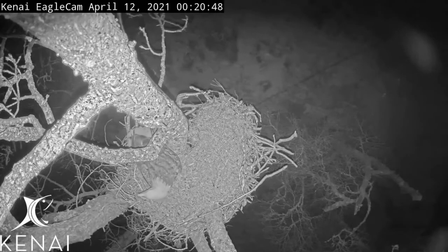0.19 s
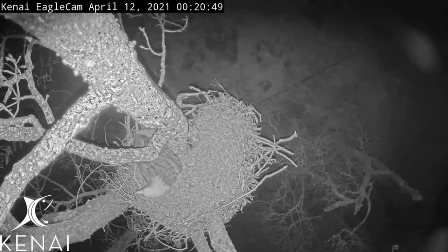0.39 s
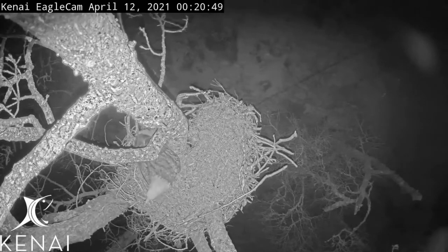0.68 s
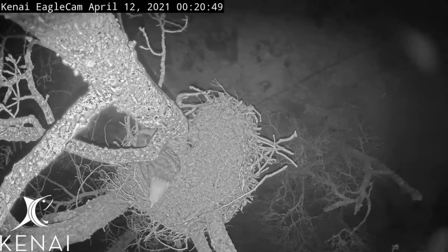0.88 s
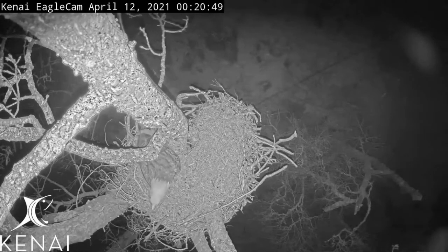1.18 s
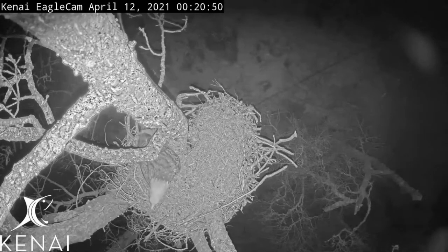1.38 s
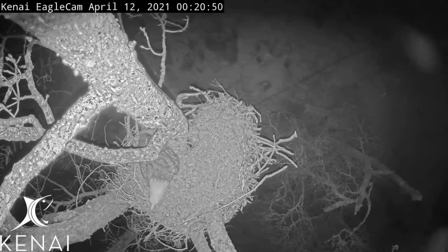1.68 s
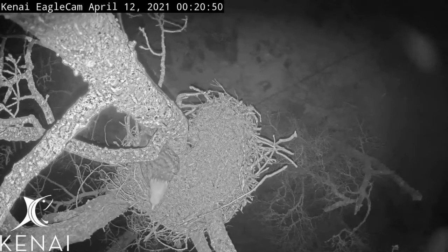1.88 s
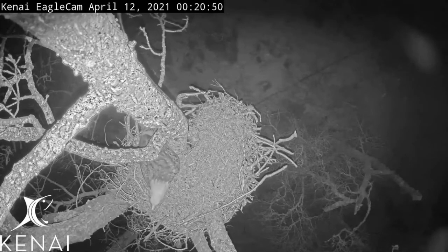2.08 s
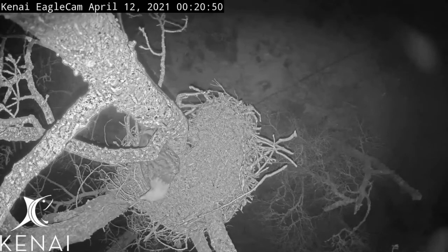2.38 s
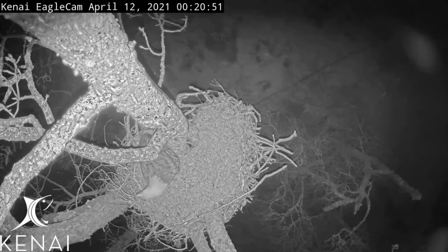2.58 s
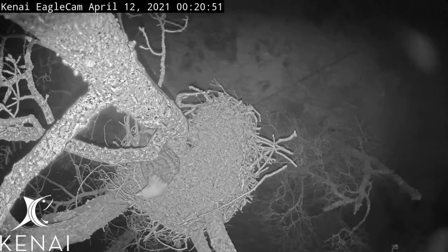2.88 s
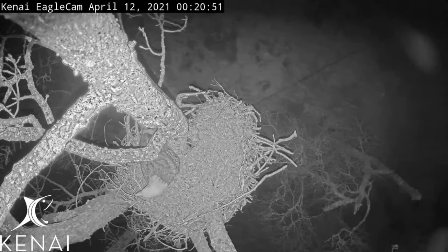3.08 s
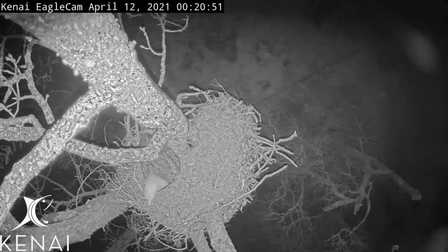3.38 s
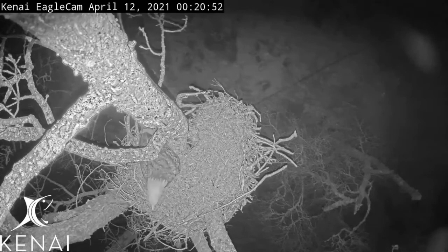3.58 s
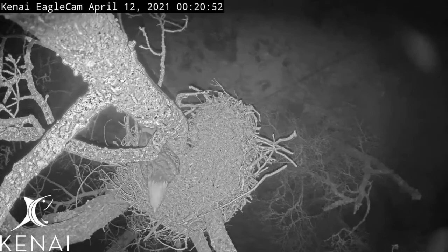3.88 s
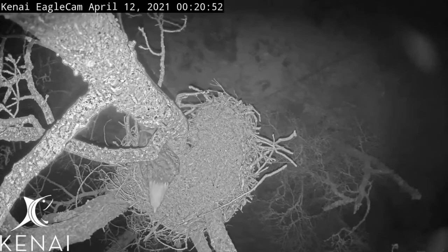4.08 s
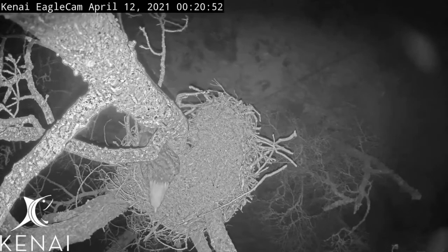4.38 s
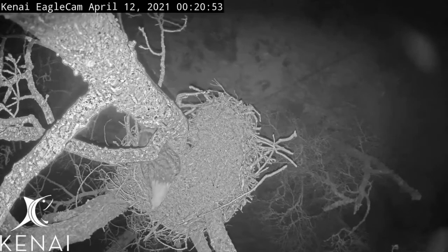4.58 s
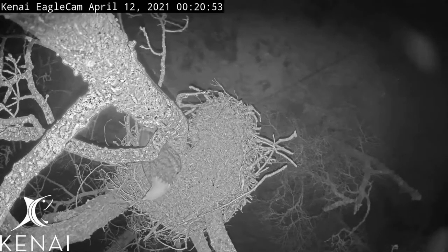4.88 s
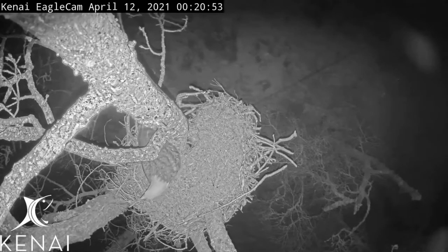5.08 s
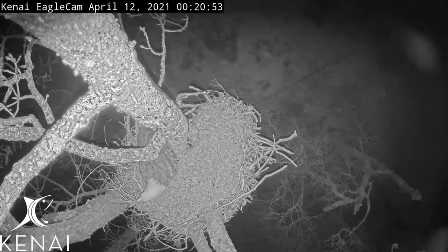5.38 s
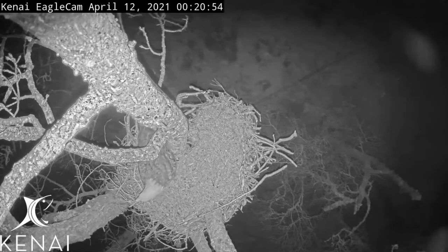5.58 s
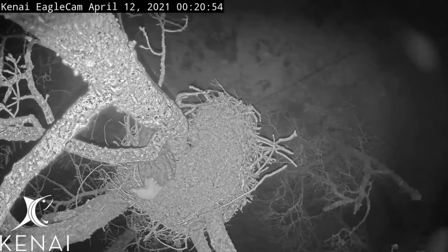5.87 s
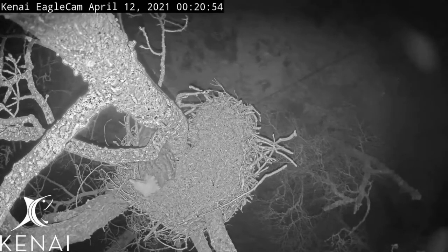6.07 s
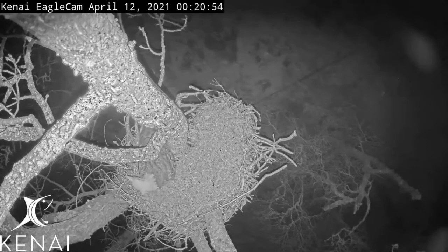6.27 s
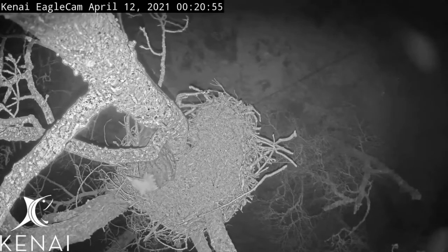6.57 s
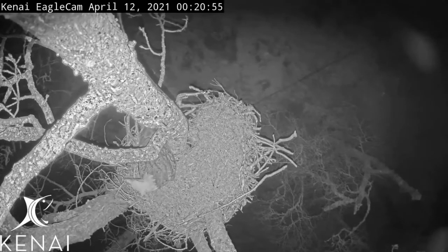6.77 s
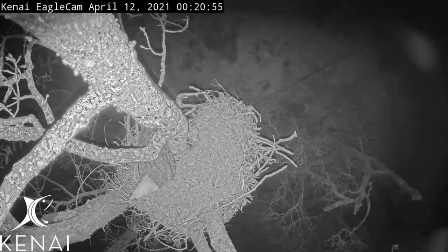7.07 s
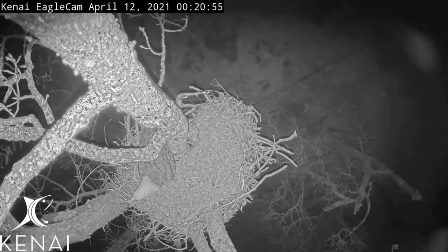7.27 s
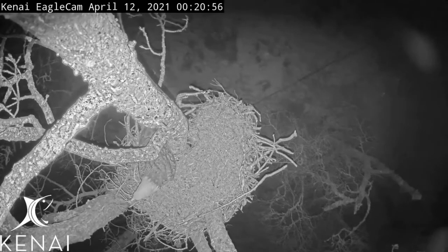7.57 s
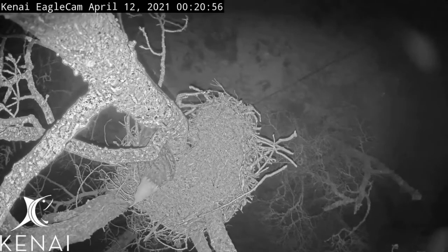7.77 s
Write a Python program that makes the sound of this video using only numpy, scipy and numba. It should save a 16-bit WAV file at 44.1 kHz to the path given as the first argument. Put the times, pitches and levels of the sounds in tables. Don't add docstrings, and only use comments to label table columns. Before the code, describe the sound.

An eagle at a nest gives two bouts of quick, high piping whistles at night while gusty wind rumbles and thumps on the microphone.

```python
import sys
import numpy as np
from scipy import signal
from scipy.fft import rfft, irfft
from scipy.io import wavfile
from scipy.ndimage import uniform_filter1d
from numba import njit

SR = 44100
rng = np.random.default_rng(int(sys.argv[2]) if len(sys.argv) > 2 else 0)


def materialize(psi):
    bounded = np.clip(np.atleast_2d(psi).T, -1, 1)
    quanta = np.round(bounded * 32767).astype(np.int16)
    wavfile.write(sys.argv[1], SR, quanta)


def gain_from_decibels(decibels):
    exponent = np.asarray(decibels, float) / 20
    return 10 ** exponent


N = 347508

LEAD_S = 0.008
REST_HZ = 3000
NOTE_MAX = SR // 4

# (frequency [Hz], gain [dB])
THROAT = [(3000, 1.5), (3700, 0), (4400, 2.5), (5100, -6.5), (5800, -7), (6300, -11)]
# (level [dB], octave level [dB])
CHIRP_SHAPE = [(5, -6.5), (1, -8.5), (0.5, 1), (-2.5, -7), (-4.5, 10.5)]


def unit(x):
    return x / np.sqrt(np.mean(x ** 2))


def walk(rate, size=N):
    k = max(int(SR / rate), 1)
    steps = np.repeat(rng.standard_normal(max(size, NOTE_MAX) // k + 1), k)
    return 1.56 * uniform_filter1d(uniform_filter1d(steps, k), k)[:size]


def coloured(points, size=N):
    hz, db = np.transpose(points)
    bins = np.arange(size // 2 + 1) * SR / size + 1
    shape = gain_from_decibels(np.interp(np.log(bins), np.log(hz), db, left=-90, right=-90))
    return unit(irfft(rfft(rng.standard_normal(size)) * shape, size))


@njit
def svf(x, hz, width):
    y, b, l = np.empty(len(x)), 0., 0.
    for i in range(len(x)):
        g, k = np.tan(np.pi * hz[i] / SR), width / hz[i]
        v = (b + g * (x[i] - l)) / (1 + g * (g + k))
        b, l, y[i] = 2 * v - b, l + 2 * g * v, k * v
    return y


def resonant_noise(size, drawn, hz, width):
    noise = rng.standard_normal(drawn)[:size]
    return unit(svf(svf(noise, hz, width), hz, width))


def gate(size, attack_s, release_s):
    t = np.arange(size) / SR
    return np.clip(np.minimum(t / attack_s, t[::-1] / release_s), 0, 1) ** 2


def add(track, sound, start_s):
    i = int(start_s * SR)
    track[i:i + len(sound)] += sound[:len(track) - i]


def gusts():
    # (time [s], level [dB], hum share [dB])
    lulls = [(0.0, -36.5, -8), (0.59, -33, -1.5), (2.13, -27, -2.5), (2.41, -20, -5.5), (2.85, -28.5, -2),
             (3.01, -36, -14), (3.53, -32.5, -3), (3.86, -39.5, -5.5), (4.1, -35, 5), (4.48, -31, -12.5),
             (4.83, -23.5, -2.5), (5.11, -33.5, -8.5), (5.27, -23.5, -1.5), (5.73, -21.5, -6),
             (6.28, -13.5, -1.5), (7.07, -26, -7), (7.84, -23.5, 1), (7.88, -16, -3.5)]
    # (centre [s], rise [dB], length [s], hum share [dB])
    puffs = [(0.317, 5, 0.36, 2.5), (0.518, 8, 0.11, 2), (1.338, 6, 0.21, 0), (1.472, 11.5, 0.091, -0.5),
             (1.905, 6, 0.043, -1), (2.237, 5.5, 0.18, 0), (2.497, 5.5, 0.15, -2), (2.816, 4.5, 0.041, -1),
             (3.221, 8.5, 0.098, -5.5), (3.393, 8.5, .1, 2), (3.498, 8, .14, -2.5), (3.703, 1.5, 0.12, 0),
             (3.965, 4.5, 0.13, 2), (4.826, 11, 0.32, -6), (5.318, 7.5, 0.17, -2.5),
             (5.515, 15.5, 0.14, -1.5), (5.668, 12.5, 0.14, 1), (5.804, 6.5, 0.19, -1),
             (6.034, 13.5, 0.25, -1), (6.176, 9.5, 0.049, 2), (6.35, 5, 0.33, 0.5),
             (6.504, 7.5, 0.063, -5.5), (6.75, 4, 0.22, 4.5), (7.113, 2.5, 0.064, 3.5),
             (7.485, 6, 0.062, 0), (7.65, 10.5, 0.092, 0), (7.804, 8.5, 0.097, 1.5)]
    turn_gain = 1.224
    t = np.arange(N) / SR
    s, db, turn_db = np.transpose(lulls)
    force = np.interp(t, s, db) + 28
    turn = turn_gain * np.interp(t, s, turn_db)
    for at, rise_db, length_s, share_db in puffs:
        shape = np.clip(1 - np.abs(t - at) * 2 / length_s, 0, 1)
        force = force + rise_db * shape
        turn = turn + share_db * shape
    hum_db = 0.84 * force + 1.5 + turn
    thump_db = 0.85 * force + 2 - hum_db
    rush_db = 0.97 * force - 20 - hum_db
    return hum_db - 28, thump_db, rush_db


def wind():
    # (frequency [Hz], spectral level [dB per Hz])
    rush_colour = [(200, -1.5), (350, -2.5), (550, -6), (900, -16.5), (1400, -26.5), (2200, -35.5),
                   (4000, -51), (9000, -62.5)]
    hum_db, thump_db, rush_db = gusts()
    buffet = walk(14)
    thump = coloured([(4, -15.5), (20, 1.5), (50, -1.0), (100, -6.0), (220, -17.5), (400, -29.5)])
    thump = thump * gain_from_decibels(hum_db + thump_db + 2.6 * buffet - 1.5)
    force = uniform_filter1d(hum_db, SR // 4) + 26.5
    eddy_hz = np.clip(155 + 3 * force + 6 * walk(6), 90, 300)
    hum = resonant_noise(N, N, eddy_hz, 70.) * gain_from_decibels(hum_db + 1.8 * buffet - 2.5)
    rush_gain = gain_from_decibels(hum_db + rush_db + 1.0 * buffet + 2.14 * walk(70) + 2.0)
    rush = coloured(rush_colour) * (rush_gain + slaps())
    crest = uniform_filter1d(np.clip(thump + hum - .03, 0, None), size=160)
    spit = coloured([(800, -4), (2800, -14), (7800, -24), (11000, -42), (15000, -62)])
    spit_gain = gain_from_decibels(-48 + 1.6 * np.clip(hum_db + rush_db + 31, None, 2))
    return thump + hum + rush + spit * np.tanh(5 * crest) * spit_gain


def night_hiss():
    # (frequency [Hz], spectral level [dB per Hz])
    night = [(1000, -8), (2500, 0.5), (6000, -3), (9000, -5.5), (12000, -16), (15700, -15)]
    return gain_from_decibels(-73.5) * coloured(night)


def beak_octave(s, hz, db):
    # (frequency [Hz], gain [dB])
    colour = [(6000, -5), (7500, 8), (9000, -2), (10500, -6), (12000, -12), (13500, -13)]
    # (time [s], octave gain [dB])
    facing = [(0.57, 1), (0.67, -12), (0.8, -9.5), (0.9, -2), (1.4, -8.5), (1.65, -1.5), (2.5, 0),
              (4.2, -3), (4.8, 0), (5.6, 2), (6.6, 4), (7.6, 0)]
    effort_db = -0.5 * (db + 51.5)
    return effort_db + np.interp(2 * hz, *np.transpose(colour)) + np.interp(s, *np.transpose(facing))


def arch(s, length_s, start_hz, top_hz, end_hz, db, shape, octave_db=None, settles=1, throat=THROAT):
    lean = 0.85
    u = np.linspace(0, 1, 7)
    up, down = np.sqrt(max(top_hz - start_hz, 1)), np.sqrt(max(top_hz - end_hz, 1))
    hz = top_hz - ((up + down) * np.minimum(u / settles, 1) ** lean - up) ** 2
    lift = np.interp(hz, *np.transpose(throat))
    fall, opening = (np.interp(u, np.linspace(0, 1, len(shape)), c) for c in np.transpose(shape))
    if octave_db is None:
        octave_db = beak_octave(s, hz, db)
    return np.transpose([s + length_s * u, hz, db + fall + lift, octave_db + opening - lift])


def whistle(note):
    s, hz, db, octave_db = np.transpose(note)
    t = np.arange(s[0] - LEAD_S, s[-1], 1 / SR)
    size = len(t)
    since = np.clip(t - s[0], 0, None)
    level_db = np.interp(t, s, db)
    pitch = np.polyval(np.polyfit(s - s[0], hz, len(s) - 1), since)
    steady = .008 * np.clip((-27 - db.max()) / 14, .35, 1)
    strain = np.clip((hz.max() - 3900) / 2600, 0, 1)
    flutter = (steady + 0.0075 * strain) * walk(500, size=size)
    phase = 2 * np.pi * np.cumsum(pitch * (1 + flutter)) / SR
    low = 2 * np.pi * np.cumsum(735 * (1 + .05 * walk(250, size=size))) / SR
    chop = 1 + (0.042 + 0.082 * strain) * np.sin(low)
    octave = gain_from_decibels(np.interp(t, s, octave_db))
    third = octave * gain_from_decibels(-24 - 30 * np.clip(hz.max() - 3850, 0, None) / 1000 + 6 * (pitch < 2000))
    fourth = gain_from_decibels(-12.5) * (pitch > 3300)
    grain_db = np.clip((-33 - db.max()) / 5, .4, 2.5) + 1.5 * strain
    thirds = gain_from_decibels(-38.5 + 15.0 * strain) * (gain_from_decibels(-4) * np.sin(phase / 3) + np.sin(2 * phase / 3))
    upper = third * (np.sin(3 * phase) + fourth * np.sin(4 * phase))
    tone = np.zeros(size)
    for partial in (thirds, chop * np.sin(phase), octave * np.sin(2 * phase), upper):
        sway_db = (2.2 + 1.5 * strain) * walk(160, size=size)
        tone += partial * gain_from_decibels(sway_db + grain_db * walk(700, size=size))
    rasp = resonant_noise(size, NOTE_MAX, .75 * pitch, 2600.)
    rasp = rasp * gain_from_decibels((np.mean(db) + level_db) / 2 - 29 + 26 * strain + 3 * walk(170, size=size))
    opening = np.clip(since / .008, 0, 1) ** 2 * gate(size, .001, .008)
    rungs = np.arange(2, 14)[:, None]
    age = np.clip(t - t[0] - .0007 * rungs, 0, None) / .003
    rung_db = db.max() - 25 + 4.0 * rng.standard_normal(rungs.shape) - 1.6 * np.abs(rungs - 5)
    pulses = gain_from_decibels(rung_db) * age * np.exp(1 - age)
    catch = np.sum(pulses * np.sin(rungs * low + rungs ** 2), axis=0)
    return (np.sqrt(2) * tone * gain_from_decibels(level_db) + rasp) * opening + catch


def cry(row, after):
    # (level [dB], octave level [dB])
    cry_shape = [(4.5, -5.5), (0, -7.5), (-1, -2), (-3.5, 3.5), (-10.5, 3.5)]
    # (frequency [Hz], gain [dB])
    gape = [(4000, -19), (5000, -3), (5700, 6), (6000, 8), (6400, -3.5), (6750, -1)]
    s, length_s, start_hz, top_hz, db = row
    joined = abs(after[0] - s - length_s) < 0.014
    throat = gape if db > -45 else THROAT
    if joined and after[2] < top_hz - 1000:
        return arch(s, length_s, start_hz, top_hz, after[2], db, cry_shape, settles=0.78)
    keeps = 0.7 if joined and after[3] > top_hz else 0.31
    end_hz = REST_HZ + keeps * (top_hz - REST_HZ)
    return arch(s, length_s, start_hz, top_hz, end_hz, db, cry_shape, throat=throat)


def ladder(length_s, hz, db, throat_hz):
    size = int(length_s * SR)
    phase = 2 * np.pi * np.cumsum(hz * (1 + .2 * length_s * walk(200, size=size))) / SR
    k = np.arange(2, 15)[:, None]
    off = (k * hz - throat_hz) / 600
    weight = gain_from_decibels(-15 - 2.5 * np.abs(off)) + np.exp(-off ** 2)
    wobble = gain_from_decibels(5.0 * np.array([walk(200, size=size) for _ in k]))
    fade = gain_from_decibels(db - 150 * np.arange(size) / SR) * gate(size, .005, .01)
    return np.sqrt(2) * fade * np.sum(weight * wobble * np.sin(k * phase + k ** 2), axis=0)


def chirp(s, length_s, start_hz, top_hz, db):
    end_hz = REST_HZ + 0.3 * (top_hz - REST_HZ)
    return arch(s, length_s, start_hz, top_hz, end_hz, db, CHIRP_SHAPE)


def pipe(s, length_s, hz, db, octave_db):
    # (level [dB], octave level [dB])
    pipe_shape = [(0, -20.5), (4.5, 4.5), (0.5, -2), (0.5, 12), (-10, 4)]
    note = arch(s, length_s, hz, hz, hz, db, pipe_shape, octave_db)
    u = np.linspace(0, 1, len(note))
    scoop_hz = 96 * (1 - u) ** 4
    sag_hz = 0.11 * hz * (hz > 3300) * u ** 5
    note[:, 1] -= scoop_hz + sag_hz
    return note


def slaps():
    # (time [s], peak level [dB])
    slap_table = [
        (2.164, -30),
        (2.63, -39),
        (2.67, -24.5),
        (5.329, -19.5),
        (5.471, -16.5),
        (5.629, -19.5),
        (5.792, -27.5),
        (6.489, -29),
        (7.638, -27.5),
        (7.831, -18.5),
    ]
    out = np.zeros(N)
    t = np.arange(SR // 20) / SR
    for s, db in slap_table:
        add(out, gain_from_decibels(db - 3.0) * np.exp(-t / 0.0054) * gate(len(t), 0.0018, .01), s)
    return out


def squeak(s, hz, db):
    return arch(s, 0.023, 0.9 * hz, hz, hz, db, CHIRP_SHAPE, octave_db=-43)


def eagles():
    # (time [s], length [s], start [Hz], top [Hz], level [dB])
    cries = [
        (0.568, .098, 4260, 5825, -43),
        (0.663, 0.1, 5960, 6730, -40.5),
        (0.77, 0.083, 6130, 6580, -42),
        (0.893, 0.075, 4240, 5220, -46),
        (4.135, .105, 3710, 5700, -45),
        (4.234, .104, 4530, 6280, -50),
        (4.331, 0.082, 4200, 5680, -51.5),
        (4.452, 0.071, 3730, 4840, -45),
        (7.028, 0.088, 3690, 5050, -47.5),
    ]
    # (time [s], length [s], pitch [Hz], level [dB], throat resonance [Hz])
    ladders = [(0.598, 0.027, 755, -55, 3680), (0.673, 0.064, 730, -67, 4380),
               (0.788, 0.16, 740, -55, 3700), (0.901, 0.036, 757, -45.5, 3300),
               (1.293, 0.027, 747, -58, 2900), (1.432, 0.017, 714, -55, 2840),
               (1.645, 0.0095, 730, -51, 2150), (2.22, 0.023, 730, -63, 2930),
               (2.733, 0.057, 680, -58, 1340), (4.168, 0.062, 745, -59, 3760),
               (4.353, 0.074, 753, -55, 3760), (4.471, 0.038, 770, -57, 3000),
               (4.572, 0.028, 764, -42, 3150), (4.691, 0.022, 753, -39, 3080),
               (5.094, 0.053, 702, -65.5, 3950), (5.425, 0.017, 738, -47.5, 2930),
               (6.137, 0.021, 743, -34, 2960), (6.514, 0.023, 654, -44.5, 2700),
               (6.642, 0.027, 715, -39.5, 3000), (7.037, 0.067, 745, -52, 3420),
               (7.278, 0.022, 739, -50, 3040), (7.416, 0.027, 727, -41.5, 3000),
               (7.567, 0.025, 700, -57.5, 2820), (7.732, 0.022, 687, -54.5, 2760)]
    # (time [s], length [s], start [Hz], top [Hz], level [dB])
    chirps = [(1.026, 0.056, 3920, 4580, -46.5), (1.161, 0.059, 4030, 4350, -53.5),
              (1.303, 0.027, 3890, 3950, -41.5), (1.438, 0.037, 3520, 3607, -45.5),
              (1.634, 0.043, 4340, 4420, -55), (2.228, 0.05, 3430, 4100, -52),
              (2.463, 0.05, 3540, 3794, -50.5), (2.738, 0.046, 3380, 3440, -53),
              (4.699, 0.05, 4080, 4330, -52.5), (4.812, 0.049, 3470, 3680, -51),
              (5.431, 0.071, 3950, 4525, -51), (5.554, 0.063, 3240, 4010, -50.5),
              (5.699, .06, 3380, 3836, -52), (5.832, .055, 3470, 3780, -51),
              (6.25, 0.06, 3680, 4096, -43.5), (6.528, .05, 3280, 3660, -46.5),
              (6.636, 0.074, 3900, 4565, -49), (7.416, 0.057, 4040, 4280, -49.5),
              (7.575, 0.05, 3500, 3800, -50), (7.737, 0.044, 3410, 3540, -49.5)]
    # (time [s], length [s], pitch [Hz], level [dB], octave above whistle [dB])
    pipes = [(1.164, 0.025, 3043, -31.5, -18), (1.628, 0.024, 2924, -32, -17.5),
             (1.828, 0.035, 2815, -35, -18.5), (1.985, 0.034, 2853, -34, -16.5),
             (3.221, 0.047, 1205, -48.5, -10), (4.06, 0.055, 3640, -61.5, -7),
             (4.582, 0.042, 3685, -31.5, -23), (4.966, 0.038, 2908, -32, -13),
             (5.096, .035, 2820, -38, -13.5), (6.141, 0.059, 3696, -31, -10.5),
             (7.156, .065, 3778, -31.5, -16.5), (7.287, 0.051, 3630, -29.5, -20.5)]
    # (time [s], top [Hz], level [dB])
    squeaks = [
        (4.235, 5000, -37),
        (4.563, 4370, -53),
        (6.126, 4560, -50),
        (7.139, 5160, -43),
        (7.273, 4500, -54),
    ]
    notes = [cry(row, after) for row, after in zip(cries, cries[1:] + cries[:1])]
    notes += [chirp(*row) for row in chirps]
    notes += [pipe(*row) for row in pipes]
    notes += [squeak(*row) for row in squeaks]
    out = np.zeros(N)
    for note in notes:
        add(out, whistle(note), note[0][0] - LEAD_S)
    for s, *rest in ladders:
        add(out, ladder(*rest), s)
    return out


def trees(dry, near_t60_s=0.068, near_db=-6, far_t60_s=0.38, far_db=-14):
    t = np.arange(SR) / SR
    near = rng.standard_normal(SR) * gain_from_decibels(-60 * t / near_t60_s) * (t > .004)
    far = coloured([(500, -25), (2450, -20), (2800, -23.5), (4000, -12.5), (8000, -14), (16000, -7)], size=SR)
    far = far * gain_from_decibels(-60 * t / far_t60_s) * (t > .02)
    tail = gain_from_decibels(near_db) * near / np.linalg.norm(near) + gain_from_decibels(far_db) * far / np.linalg.norm(far)
    return dry + signal.fftconvolve(dry, tail)[:N]


def scene():
    return (trees(eagles()) + wind() + night_hiss())[None, :]


def top_cut(x):
    return signal.sosfilt(signal.butter(12, 15780, fs=SR, output="sos"), x)


def record(dry):
    rounded = np.tanh(1.3 * dry) / 1.3 * gate(N, .004, 1 / SR)
    return top_cut(rounded)


dry = scene()
out = record(dry)
materialize(out)
```